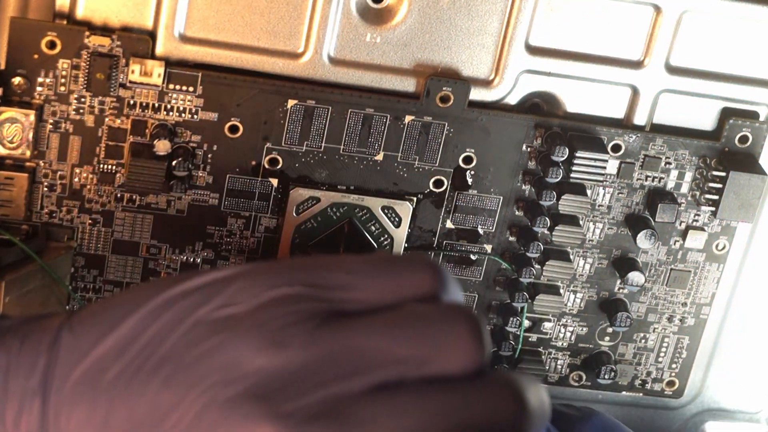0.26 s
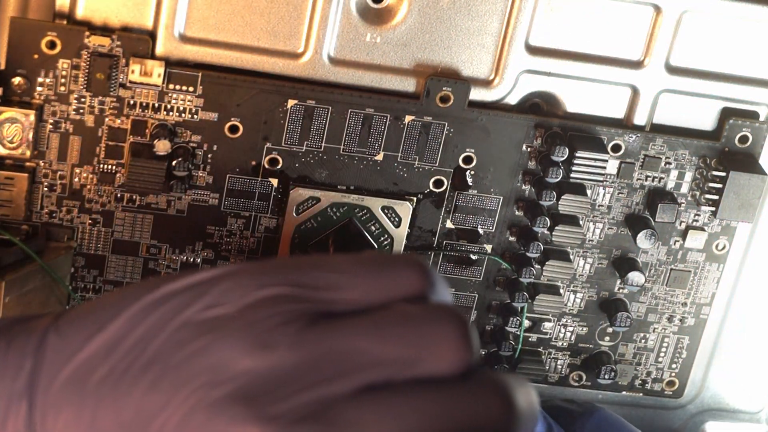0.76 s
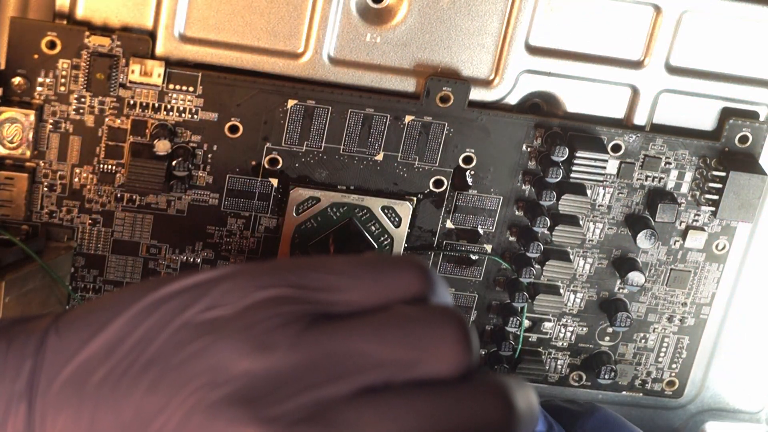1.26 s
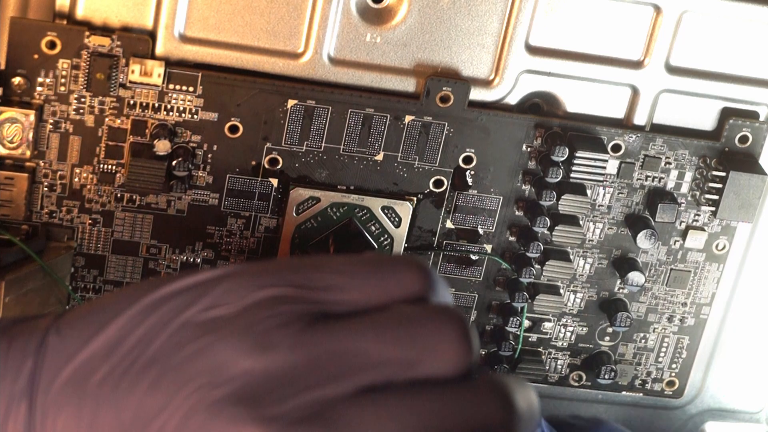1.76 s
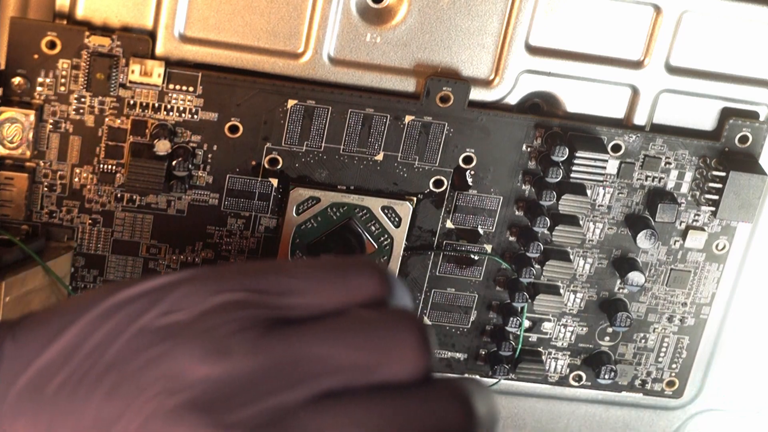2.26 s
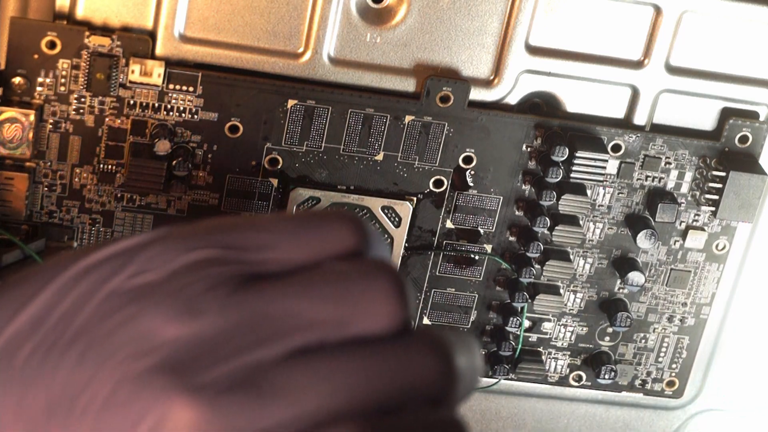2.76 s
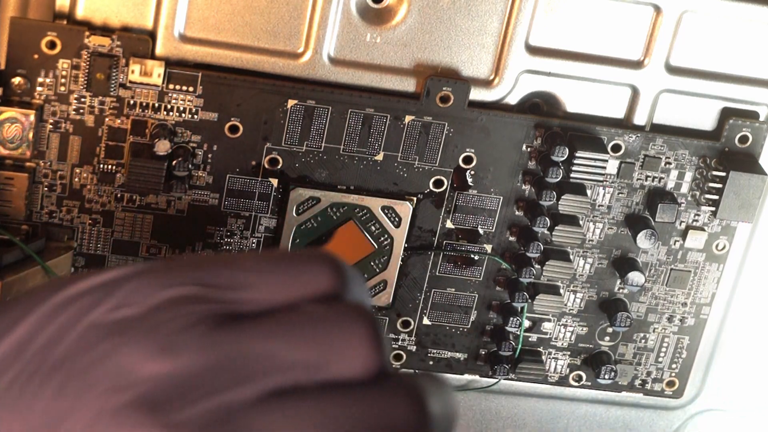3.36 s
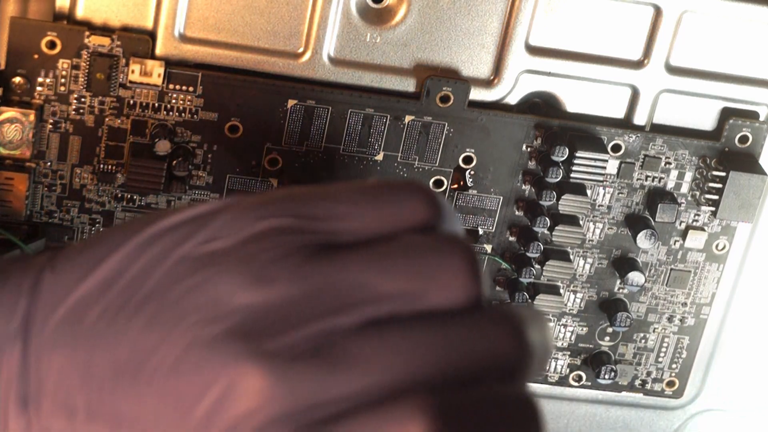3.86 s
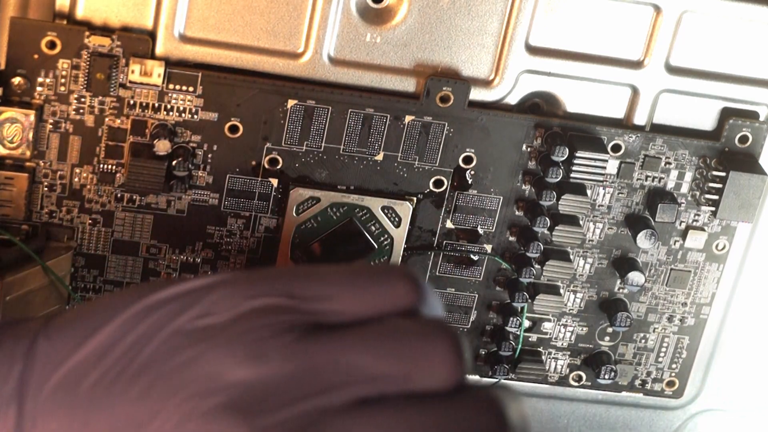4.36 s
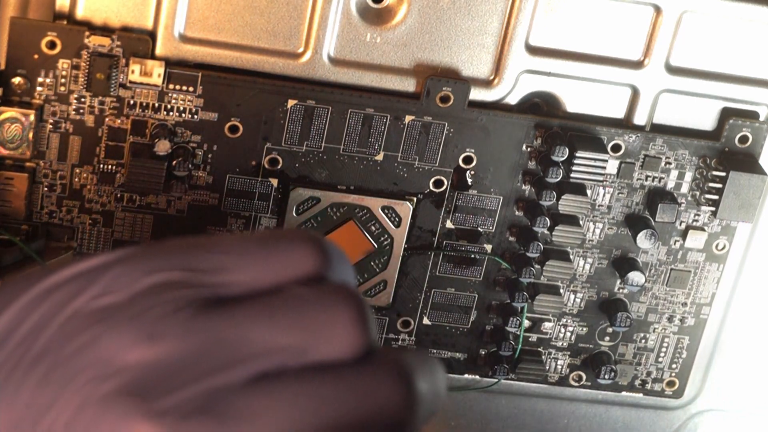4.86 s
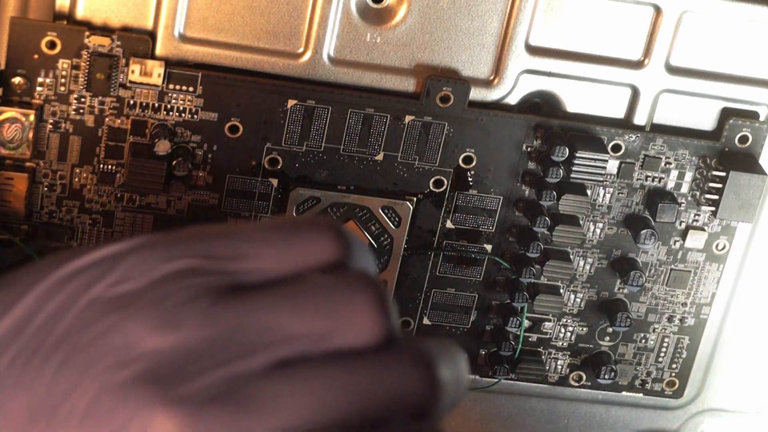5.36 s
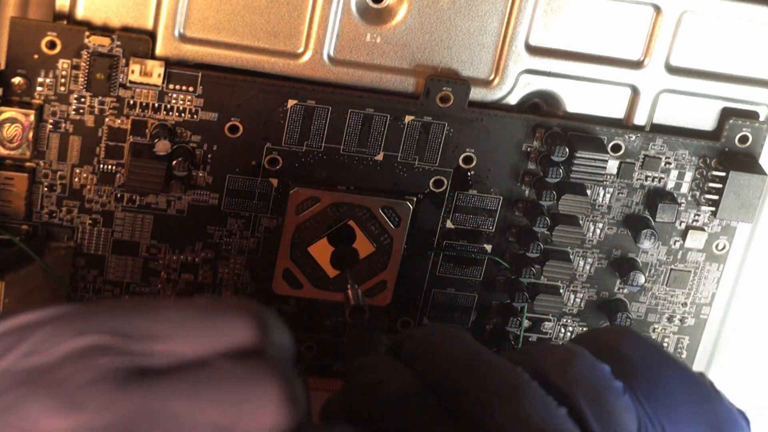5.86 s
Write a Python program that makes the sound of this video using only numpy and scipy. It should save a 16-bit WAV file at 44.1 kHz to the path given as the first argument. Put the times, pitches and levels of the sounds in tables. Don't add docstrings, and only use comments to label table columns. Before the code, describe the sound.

A hot air tool blows steadily with a breathy whistle and hiss, while a small tool lightly taps, knocks and scrapes a circuit board.

```python
import sys
import numpy as np
from scipy import signal
from scipy.fft import rfft, irfft, next_fast_len
from scipy.io import wavfile
from scipy.ndimage import uniform_filter1d, map_coordinates

SR = 44100
rng = np.random.default_rng(int(sys.argv[2]) if len(sys.argv) > 2 else 0)


def ratio_of_db(decibels):
    return 10 ** (np.asarray(decibels, float) / 20)


def dump_mix(stems):
    frames = np.atleast_2d(stems).T
    limited = np.clip(frames, -1, 1)
    pcm = np.round(limited * 32767).astype(np.int16)
    wavfile.write(sys.argv[1], SR, pcm)


N = 269010


def unit(x):
    return x / np.sqrt(np.mean(x ** 2) + 1e-20)


def along(points, hz):
    f, v = np.transpose(points)
    return np.interp(np.log(hz + 1), np.log(f + 1), v)


def curves(rows):
    s, *cols = np.transpose(rows)
    return [np.interp(np.arange(N) / SR, s, c) for c in cols]


def filtered(x, response):
    m = next_fast_len(N + SR // 2)
    hz = np.fft.rfftfreq(m, 1 / SR)
    return irfft(rfft(x, m) * response(hz), m)[..., :N]


def peak(hz, centre_hz, width_hz):
    return 1 / (1 + (2 * (hz - centre_hz) / width_hz) ** 2)


def rush(gain, patchy_db, wide=5, long=30):
    # frequency in Hz, left-right likeness from 0 to 1.
    likeness = [(60, 0.68), (250, 1), (500, 0.84), (900, 0.85), (2400, 0.77), (3050, 0.83), (3500, 0.59),
                (4400, 0.57), (6000, 0.81), (8300, 0.4), (10000, .5), (11200, .3), (13700, .42),
                (16000, .35)]
    z = signal.stft(rng.standard_normal((2, N)), nperseg=1024)[2]
    field = uniform_filter1d(rng.standard_normal(z.shape[1:]), size=wide, axis=0)
    field = uniform_filter1d(field, size=long, axis=1)
    pair = signal.istft(z * ratio_of_db(patchy_db * unit(field)), nperseg=1024)[1][:, :N]

    def mid_side_gain(hz):
        angle = np.arccos(np.clip(along(likeness, hz), -1, 1)) / 2
        return gain(hz) * [np.cos(angle), np.sin(angle)]

    mid, side = filtered(pair, mid_side_gain)
    return unit(np.array([mid + side, mid - side]))


def hot_air():
    # frequency in Hz, spectral level in dB per Hz.
    blower_colour = [(18, -85), (30, -58), (112, -44), (199, -22.5), (228, -17.5), (256, -7), (389, -7),
                     (428, -12.5), (471, -7.5), (628, -10.5), (1030, -6.5), (1250, -9), (2020, -3.5),
                     (2690, -4), (2900, -1), (3770, -61), (6380, -120)]
    jet_colour = [(1940, -48), (3300, -9.5), (3520, 0), (4530, -7), (4750, -5.5), (5880, -6), (8500, -15.5),
                  (11000, -36.5), (18700, -120)]
    hiss_colour = [(4400, -46), (7500, -0.5), (8800, -1.5), (9700, -2.5), (11500, -6.5), (13500, -7.5),
                   (15000, -7), (16000, -17)]
    # frequency in Hz, width in Hz, level in dB.
    tube_modes = [(2897, 130, -7.5), (3034, 102, -2), (3184, 225, -1), (3320, 79, -4.5), (3377, 46, -1.5)]
    # time in seconds, shade in dB.
    hand_shade = [(0, 1.5), (.13, 0), (1.54, 0), (1.9, 1), (2.05, -0.5), (2.6, 1.5), (2.9, 4), (3.23, 2),
                  (3.46, 3), (3.58, 8), (3.92, 4.5), (4.2, 0.5), (4.8, 1.5), (4.87, 3), (5.28, 6.5),
                  (5.64, 6.5), (5.72, 11.5), (6.1, 9)]
    shade_db, = curves(hand_shade)

    def tube(hz):
        return sum(ratio_of_db(db) * peak(hz, c, 1.25 * w) ** 2 for c, w, db in tube_modes)

    blower = rush(lambda hz: ratio_of_db(along(blower_colour, hz)), patchy_db=1.17)
    whistle = rush(tube, patchy_db=.8, wide=2, long=14)
    jet = rush(lambda hz: ratio_of_db(along(jet_colour, hz)), patchy_db=0.16)
    hiss = rush(lambda hz: ratio_of_db(along(hiss_colour, hz)), patchy_db=.9, wide=8)
    return (ratio_of_db(-37 - .06 * shade_db) * blower
            + ratio_of_db(-36 - shade_db) * whistle
            + ratio_of_db(-35 - .28 * shade_db) * jet
            + ratio_of_db(-42.5 + .1 * shade_db) * hiss)


def ridges(hz):
    # frequency in Hz, width in Hz, lift in dB (negative for a null).
    room_modes = [(204.8, 14.4, 14), (296, 16, 5.5), (399.3, 26.3, 10), (475, 42, 5), (614, 30, 1),
                  (803, 14, 9.5), (867, 9.5, 11), (919, 31, 8), (1069, 31, 7.5), (1165, 16, 9),
                  (1273, 14, 5.5), (1335, 34, 5), (1463, 21, 6.5), (1570, 25, 4.5), (1691, 21, 5.5),
                  (1852, 23, 7), (1950, 19, 1), (2008, 29, 6), (2150, 71, 4), (2280, 59, -1.5),
                  (2383, 36, 6), (2582, 21, 8),
                  (240, 24, -8.5), (257, 16, 5.5), (351, 23, 5.5), (500, 33, -6.5), (632, 25, -11.5),
                  (692, 20, -4.5), (762, 41, 1), (819, 18, -21), (886.5, 20, -10), (927, 24, -5),
                  (973, 42, 3), (1310, 30, -1), (1292, 25, -3.5), (1606, 17, -12),
                  (2726, 30, 4), (2864, 30, 4), (2902, 35, 5), (3002, 40, 8), (3055, 25, 4),
                     (3112, 25, 7), (3199, 35, 8), (3300, 25, 2), (3337, 30, 6), (3515, 28, 3),
                     (3630, 35, 5), (3680, 35, 4), (3763, 23, 4), (3849, 35, 5), (4000, 28, 8),
                     (4030, 20, 5), (4237, 45, 6), (4371, 26, 7), (4422, 22, 11), (4509, 35, 8),
                     (4605, 45, 4),
                  (5330, 260, 3), (5880, 32, 7), (6180, 24, 4), (6300, 86, 3), (6580, 79, 5.5),
                 (6980, 130, 6), (7100, 76, 4.5), (7540, 78, 4.5), (7800, 67, -4.5), (9450, 150, 3.5),
                 (10000, 160, 1.5)]
    modes = room_modes
    return ratio_of_db(sum(db * peak(hz, c, w) for c, w, db in modes))


def ripple(hz, spacing_hz, twist):
    # frequency in Hz, ripple depth in dB.
    depth = [(1500, .4), (4500, .5), (4900, 1.5), (10000, 1.2), (15000, .9)]
    knots = rng.standard_normal((4, 1000))
    shared, left, right, phase = [map_coordinates(k, [hz / spacing_hz], mode="wrap") for k in knots]
    turn = np.exp(1j * np.outer([1, -1], along(twist, hz) * phase))
    level_db = along(depth, hz) * (shared + 1.4 * np.array([left, right]))
    return ratio_of_db(level_db) * turn


def scattered(air):
    # time in seconds, number of the hand's resting place.
    hand_place = [
        (0, 0),
        (2.3, 0),
        (3.3, 1),
        (4.6, 1),
        (5.4, 2),
        (6.1, 2),
    ]
    place, = curves(hand_place)
    twist = [(300, .05), (3000, 0.089), (8000, 0.53)]  # (Hz, phase in radians)

    def colour(hz):
        return ridges(hz) * ripple(hz, spacing_hz=31.65, twist=twist)

    out = 0
    for k in range(3):
        nearness = np.clip(1 - abs(place - k), 0, 1)
        out = out + np.sqrt(nearness) * filtered(air(), colour)
    return out


def glints():
    # centre time in seconds, length in seconds, frequency in Hz, strength in dB.
    resting = [(.3, .8, 10700, 2), (1.4, 2, 9900, 2), (2.4, 0.36, 8250, 0), (2.75, .6, 13300, -3),
               (3.0, 0.45, 6300, 1), (4.2, .3, 7700, -1), (4.4, 0.37, 6670, 2), (4.5, .3, 10700, 3),
               (4.9, .8, 11800, -6), (5.3, 1.1, 15400, -4), (5.3, 0.3, 6170, 0), (5.5, 0.84, 13200, -10),
               (5.5, 1.4, 2050, -2), (4.1, .3, 15300, 0), (3.75, 0.21, 8150, 0), (5.85, .45, 6600, 0),
               (5.75, .25, 10500, -3)]
    # centre time in seconds, length in seconds, extra path in metres, strength in dB.
    sweeps = [
        (2.85, .4, .155, -6),
        (3.48, .16, .0975, 0),
        (3.68, .3, .109, 3),
        (5.2, .7, .2, -6),
        (5.77, .3, .111, 4),
    ]
    path_growth, tooth_sharpness, bright_hz = .22, 2, 8000
    hz, t, z = signal.stft(rng.standard_normal((2, N)), SR, nperseg=512)
    hz = hz[:, None]

    def bell(x, centre, width):
        return np.exp(-np.log(16) * ((x - centre) / width) ** 2)

    def comb(s, path_m):
        return np.cos(np.pi * hz * path_m * (1 + path_growth * (t - s)) / 343) ** 2

    power = sum(ratio_of_db(2 * db) * bell(hz, c, .05 * c) * bell(t, s, length) for s, length, c, db in resting)
    teeth = sum(ratio_of_db(2 * db) * comb(s, path_m) ** tooth_sharpness * bell(t, s, length)
                for s, length, path_m, db in sweeps)
    power = power + teeth / (1 + (bright_hz / (hz + 1)) ** 8)
    tilt = ratio_of_db(-70 - 9.5 * np.log2(np.maximum(hz / 6000, 1)))
    return signal.istft(z * tilt * np.sqrt(power * SR / 2), SR, nperseg=512)[1][:, :N]


def taps():
    # start in seconds, peak in dB, favoured pitch in Hz, ring as a share of the usual decay.
    contacts = [(2.6172, -20, 900, .4), (2.626, -27, 500, .5), (2.8612, -10, 3000, .4),
                (2.8655, -15, 1800, .6), (2.8745, -21, 1700, .5), (2.887, -17, 2500, .5),
                (2.894, -18, 1200, .5), (2.9025, -21, 1000, .5), (2.955, -23, 3000, .5),
                (3.003, -21, 1700, .6), (3.009, -20, 900, .5)]
    # mode frequency in Hz, level in dB, decay t60 in seconds.
    board_modes = [(510, -4, 0.07), (590, 4.5, 0.061), (788, -3, 0.13), (1092, 2.5, 0.086),
                   (1333, -2.5, 0.08), (1745, 0.5, 0.058), (1807, 5, 0.044), (2050, -1.5, 0.067),
                   (2780, 0.5, 0.039), (3030, 8, 0.018), (3800, -14, 0.033), (5560, -14, .04),
                   (9200, -22, 0.016)]
    # start in seconds, frequency in Hz, level in dB, decay t60 in seconds.
    tip_ring = (2.963, 12710, -42, .35)
    out, t = np.zeros(N), np.arange(SR // 4) / SR
    hz, level_db, t60 = np.transpose(board_modes)[:, :, None]
    dull = signal.butter(N=3, Wn=5500, fs=SR, output="sos")
    for s, db, pitch_hz, ring in contacts:
        octaves_away = abs(np.log2(hz / pitch_hz))
        strength = level_db - 6 * octaves_away + rng.normal(0, 1.5, hz.shape)
        modes = (ratio_of_db(strength - 60 * t / (ring * t60)) * np.sin(2 * np.pi * hz * t)).sum(axis=0)
        crack = signal.sosfilt(dull, rng.standard_normal(len(t))) * ratio_of_db(6.5 - 60 * t / 0.0098)
        onset = 1 - np.exp(-t / 0.00046)
        out[round(s * SR):][:len(t)] += ratio_of_db(db - 4.0) * (modes + crack) * onset
    s, tip_hz, db, tip_t60 = tip_ring
    ping = ratio_of_db(db - 60 * t / tip_t60) * np.sin(2 * np.pi * tip_hz * t)
    out[round(s * SR):][:len(t)] += ping * (1 - np.exp(-t / .006))
    return out


def scrape():
    # frequency in Hz, body level in dB per Hz.
    body_colour = [(150, -10), (400, -5.5), (800, 3), (1800, -1), (3300, 0.5), (4200, -12.5), (6500, -18),
                   (15000, -40)]
    # start in seconds, length in seconds, level in dB.
    jerks = [
        (2.862, .04, -24),
        (2.945, .03, -26.5),
        (3.005, .028, -28.5),
    ]
    bite_s, softer = .003, 8
    fade_db_per_s, release_db_per_s = 50, 250
    grit_db, grit_t60_s = -40, .5
    unevenness = unit(uniform_filter1d(rng.standard_normal(N), size=70))
    slips = rng.standard_normal(N) * ratio_of_db(2.5 * unevenness)
    s, length, db = np.transpose(jerks)[:, :, None]
    t = np.arange(N) / SR - s
    level_db = db - fade_db_per_s * abs(t) - release_db_per_s * np.maximum(t - length, 0)
    bite = np.clip(1 + t / (bite_s * np.where(s > s[0], softer, 1)), 0, 1)
    grit = unit(filtered(slips, lambda hz: peak(hz, 5700, 2500)))
    body = unit(filtered(slips, lambda hz: ratio_of_db(along(body_colour, hz))))
    crackle = bite[0] * ratio_of_db(grit_db - 60 * abs(t[0]) / grit_t60_s) * grit
    return (bite * ratio_of_db(level_db)).max(axis=0) * body + crackle


def room(x):
    # frequency in Hz, decay t60 in seconds.
    wall_decay = [(200, 0.26), (2000, 0.42), (10000, 0.13)]
    hz, t, z = signal.stft(rng.standard_normal((2, SR // 2)), SR, nperseg=256)
    tail = signal.istft(z * ratio_of_db(-60 * t / along(wall_decay, hz)[:, None]), SR, nperseg=256)[1]
    late = np.pad(x, (150, 0))[None]
    return signal.fftconvolve(late, tail / np.linalg.norm(tail[0]), axes=1)[:, :N]


def scene():
    tool = taps() + scrape()
    bass_cut = signal.butter(N=3, Wn=260, btype="high", fs=SR, output="sos")
    tool = signal.sosfilt(bass_cut, tool)
    return scattered(hot_air) + glints() + tool + ratio_of_db(-7.0) * room(tool)


def low_pass(x):
    return signal.sosfilt(signal.butter(12, 17070, fs=SR, output="sos"), x)


def record(dry):
    # frequency in Hz, left minus right in dB.
    port_lean = [(200, -1.2), (600, -0.5), (5000, .5), (15000, 0.5)]
    top_hz = 15735
    ports = filtered(dry, lambda hz: ratio_of_db(np.outer([.5, -.5], along(port_lean, hz))) * (hz < top_hz))
    return low_pass(ports)


dry = scene()
out = record(dry)
dump_mix(out)
```